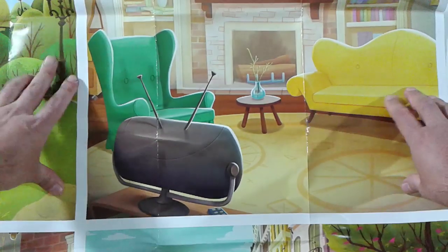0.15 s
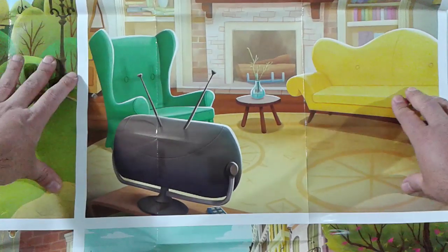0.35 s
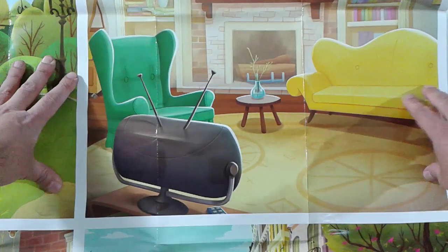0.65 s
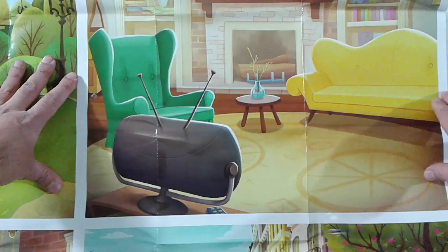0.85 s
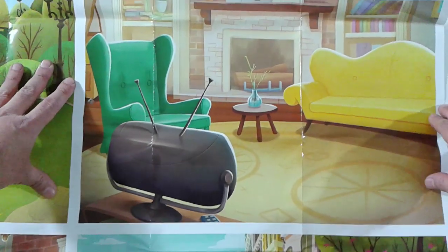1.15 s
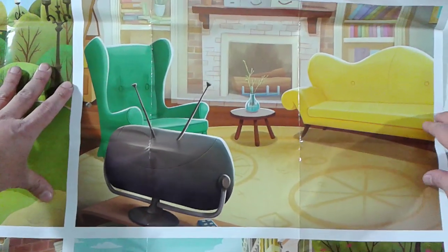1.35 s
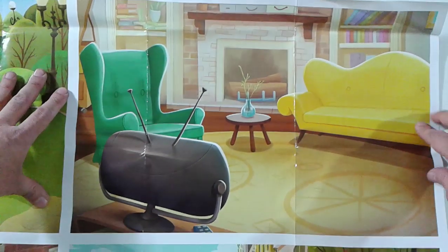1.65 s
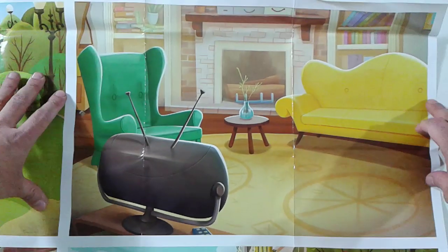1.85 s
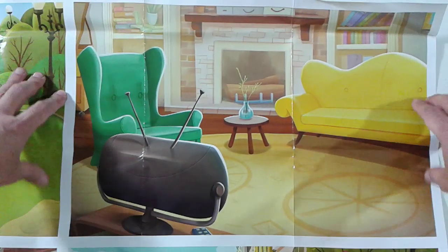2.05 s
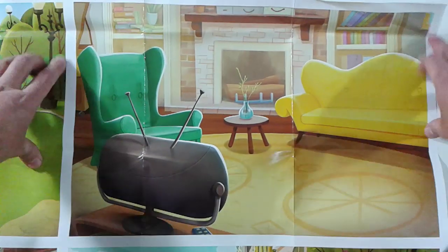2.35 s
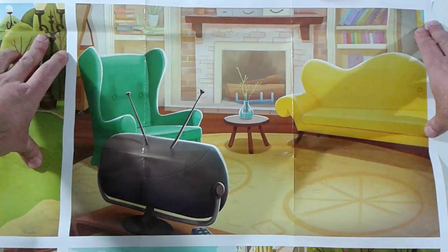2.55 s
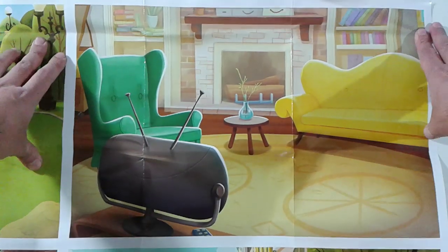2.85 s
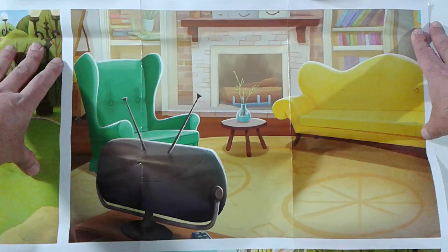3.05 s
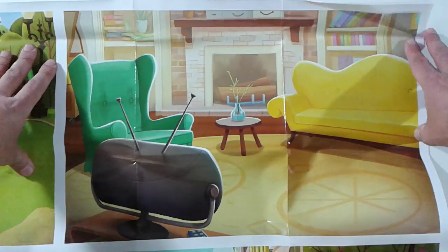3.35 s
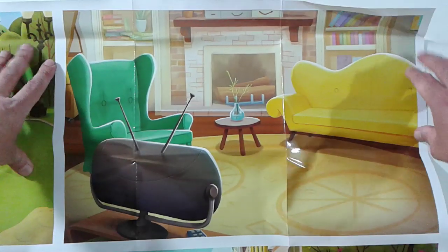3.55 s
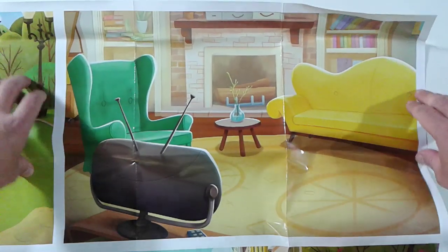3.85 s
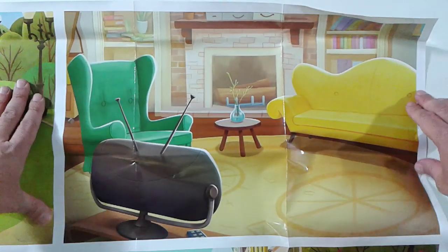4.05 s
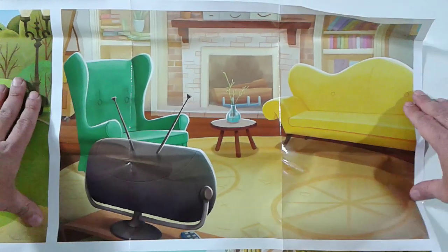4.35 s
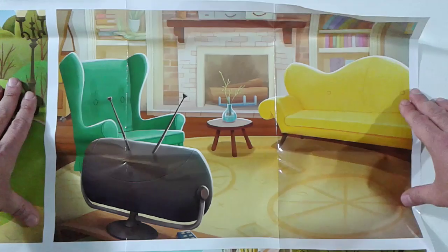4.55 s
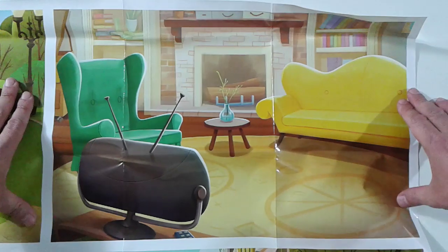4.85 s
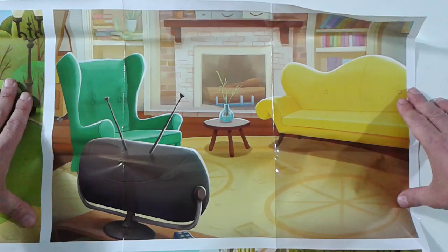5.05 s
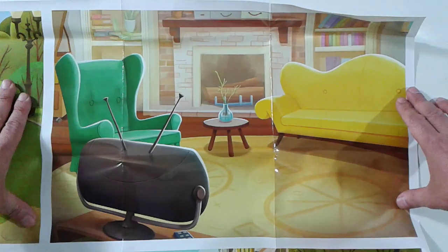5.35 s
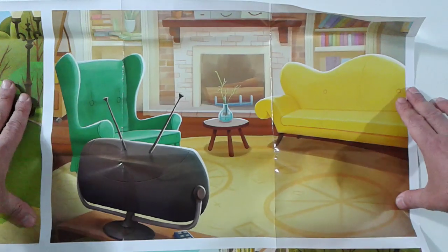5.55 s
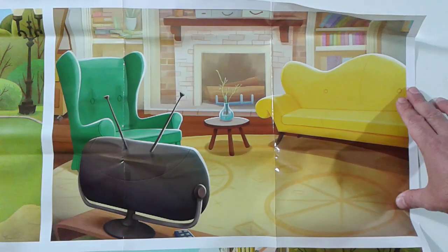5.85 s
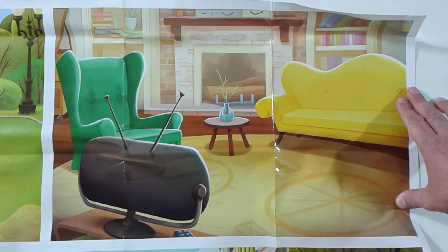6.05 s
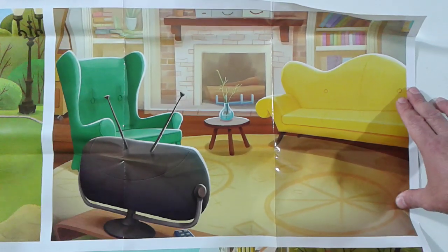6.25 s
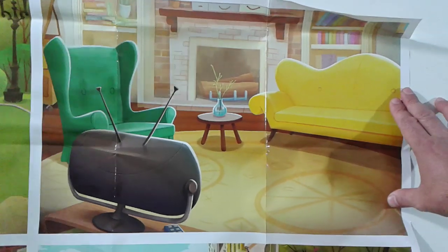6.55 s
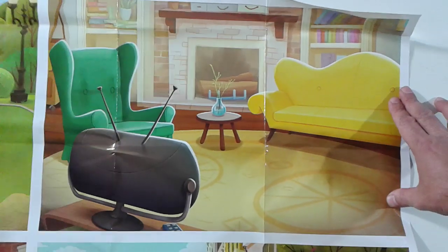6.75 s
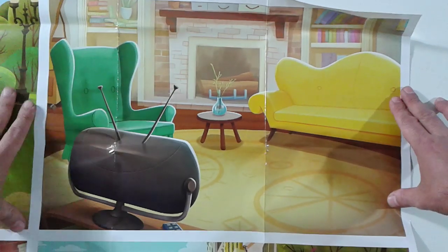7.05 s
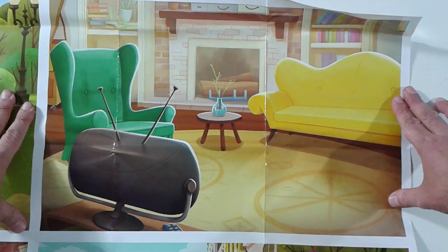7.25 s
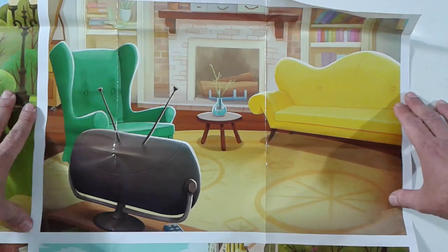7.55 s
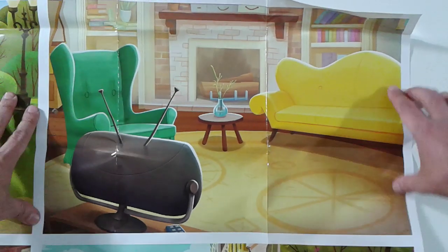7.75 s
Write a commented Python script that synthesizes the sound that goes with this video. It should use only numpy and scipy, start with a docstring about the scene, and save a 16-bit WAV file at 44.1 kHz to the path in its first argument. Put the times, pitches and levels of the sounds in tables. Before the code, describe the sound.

Close up in a small room, hands flatten a large folded glossy sheet on a table. Sharp crease pops and brisk rubbing open the sound, with brief fingertip squeaks. It calms to faint scraping, then irregular bursts of crackle and soft rustle return, separated by near-quiet with low hum and light hiss.

```python
"""A small room, heard close up: two hands spread a large, folded, glossy paper sheet over a table.
Creases snap through as the sheet buckles: noise bursts shaped by crack, facet, panel and sheet resonances.
Palms and paper slide as grainy friction noise, tiny wrinkles tick, and fingertips squeak faintly on
the coating as gliding narrow-band noise. Diffuse echoes answer over a low hum, rumble and hiss."""
import sys
import numpy as np
from scipy import signal
from scipy.fft import rfft, irfft
from scipy.io import wavfile
from scipy.ndimage import uniform_filter1d

SR = 44100
rng = np.random.default_rng(int(sys.argv[2]) if len(sys.argv) > 2 else 0)


def pcm_store(signal):
    """Save signal as 16-bit PCM."""
    levels = np.round(np.clip(np.atleast_2d(signal), -1, 1) * 32767)
    wavfile.write(sys.argv[1], SR, levels.astype(np.int16).T)


N = 348390


def gain_of(db):
    """Logarithmic level: decibels to amplitude."""
    return 10 ** (np.asarray(db) / 20)


def evened(x):
    """Normalization: scales to an rms of 1."""
    return x / np.sqrt(np.mean(abs(x) ** 2) + 1e-20)


def read(points, hz):
    """Interpolation: reads a table along a logarithmic frequency axis."""
    f, value = np.transpose(points)
    return np.interp(np.log(hz + 1), np.log(f + 1), value)


def add(mix, start_s, sound):
    """Superposition: sums a sound into the mix from its start time."""
    part = mix[max(round(start_s * SR), 0):][:len(sound)]
    part += sound[:len(part)]


def coloured(x, spectrum):
    """Linear filtering: gives a flat signal a spectrum, at an rms of 1."""
    hz = np.fft.rfftfreq(N, 1 / SR)
    return evened(irfft(rfft(x) * gain_of(read(spectrum, hz)), N))


def causal(gain):
    """Minimum phase: the spectrum of this gain that starts sharply and rings afterwards."""
    log_gain = np.log(np.maximum(gain / gain.max(), 1e-5))
    circle = np.r_[log_gain, log_gain[-2:0:-1]]
    phase = -signal.hilbert(circle).imag[:len(gain)]
    return gain * np.exp(1j * phase)


FACET_RING_DB = 11.5  # a facet's ring over the crack that strikes it
FLAP_HZ, FLAP_HZ_PER_DB = 538, 5  # a panel that is jerked harder is tauter and flaps higher
# the whole sheet heaves under each crack, by the root of its strength
HEAVE_HZ, HEAVE_OCTAVES, HEAVE_DB = 191, 0.53, -28
# Creases snapping through: start_s, crack_energy_db, crack_hz, crack_spread_octaves, facet_ring_hz,
# flap_energy_db, room_db (before the common echo_db)
CREASE_SNAPS = [(0.0244, -0.5, 2140, 1.05, 5730, -19, -8), (0.0682, -8.5, 1270, 1.4, 5330, -5, -9),
                (0.1076, -16.5, 900, 2.4, 2490, -34, -15), (0.2071, -8, 3520, 1.3, 6800, -43, -5),
                (0.2099, -4, 2300, 1.1, 4640, -15.5, -3.5), (0.5621, -24, 1300, 0.49, 1390, -16, 1),
                (0.5745, -1.5, 1540, 2, 5000, -5.5, -4), (0.6604, -13.5, 980, 0.76, 820, -18, -0.5),
                (0.7047, -23, 1200, 0.64, 1280, -20, -2), (0.7648, -6.5, 940, 1.74, 1300, -9.5, -5),
                (0.8517, -7.5, 2170, 1.23, 2550, -29, -9.5), (0.9054, -11.5, 6500, 4, 6100, -24, -4.5),
                (1.0164, -46, 2500, 2.4, 1260, -23, -1.5), (1.076, -10, 2690, 4.1, 5800, -32, -1.5),
                (1.0919, -21.5, 2500, 4, 880, -13.5, 0.5), (1.206, -30, 6660, 1.6, 2050, -24, -0.5),
                (1.9523, -26.5, 5730, 2, 1180, -37, 0), (2.1709, -21.5, 1710, 1.05, 900, -21, 2),
                (2.199, -11, 1550, 1.04, 1910, -8.5, -4.5), (2.2743, -8.5, 1030, 1.7, 2780, -29, -4),
                (2.383, -18.5, 7840, 2, 1800, -32, -7), (2.466, -21.5, 1530, 1.9, 5700, -27, 5.5),
                (3.0392, -26, 900, 3.3, 900, -20.5, 2), (3.2372, -25.5, 2870, 2.5, 1260, -34, 1.5),
                (3.366, -9, 1100, 3.9, 4440, -16, -2.5), (3.531, -23, 7640, 3.8, 1490, -44, -3.5),
                (3.7339, -27, 1590, 2.6, 1160, -22, 10.5), (3.7582, -23, 700, 2.4, 1210, -21, 2),
                (3.877, -5, 2160, 1.5, 4110, -15.5, -3.5), (4.0749, -7.5, 1450, 1.7, 2800, -28, -4.5),
                (4.307, -24, 3000, 2.1, 1460, -37, 5), (4.3997, 1.5, 1610, 1.06, 1620, -2.5, -6.5),
                (4.7461, -49, 3000, 3, 1410, -25.5, 1), (5.0898, -38, 885, 2.6, 1400, -36.5, -1),
                (5.3252, -30.5, 3760, 3.5, 1460, -26.5, -9), (5.6106, -18.5, 5700, 2.5, 955, -25, -3.5),
                (5.6203, -15, 2200, 2.4, 1320, -20.5, -3.5), (6.026, -32.5, 4130, 3.3, 1400, -28.5, -3),
                (6.128, -1.5, 1980, 1.03, 1090, -9, -4.5), (6.132, -9, 750, 1.5, 2020, -22, 0.5),
                (6.3147, -15.5, 900, 0.84, 1140, -20, -7), (6.389, -27, 2450, 2.5, 2110, -16.5, -5),
                (6.5547, -21.5, 1620, 1.7, 6000, -48, 5.5), (6.6066, -11, 2010, 0.98, 1390, -10, -1),
                (6.6638, -9.5, 1200, .79, 2580, -1.5, -3), (6.791, -8.5, 1160, 2.6, 980, -19, -2),
                (6.8048, -11.5, 1110, 0.72, 1950, -20, -1.5), (7.089, -13.5, 1090, 1.55, 1450, -9, -0.5),
                (7.1081, -18.5, 2240, 1, 1530, -11, -5), (7.518, -28, 905, 3.1, 1070, -28.5, -14),
                (7.666, -29, 3700, 1.3, 3020, -43, -7), (7.6903, -13.5, 1880, 0.78, 1970, -20, -12),
                (7.748, -42, 2770, 3, 2360, -18, -9), (7.8397, -17.5, 1420, 0.44, 1530, -37, -4.5),
                (7.878, -21, 900, 2, 1350, -13, -6)]


def snaps(snap_time=0.0027, snap_hz=1500, shortening=0.35, flap_octaves=0.88, direct_db=0, echo_db=-0.5,
          bounce=0.25, bounce_time=0.001065, ring_in_room=0.47, spread_in_room=1.36):
    """Snap-through buckling: a crease cracks, rings a stiff facet, jerks its panel and heaves the sheet."""
    out, hz = np.zeros(N), np.fft.rfftfreq(2048, 1 / SR)
    for start_s, crack_db, crack_hz, octaves, ring_hz, flap_db, room_db in CREASE_SNAPS:
        # small, bright creases give way faster
        slips = buckle(snap_time * (snap_hz / crack_hz) ** shortening)

        flap_hz = FLAP_HZ + FLAP_HZ_PER_DB * flap_db
        flap = gain_of(flap_db) * radiated(hz, flap_hz, flap_octaves)
        heave = gain_of(crack_db / 2 + HEAVE_DB) * radiated(hz, HEAVE_HZ, HEAVE_OCTAVES)
        low_motion = np.hypot(flap, heave)

        # the crack also bounces off the table, which combs its spectrum
        delay_s = bounce_time * rng.uniform(0.453, 1.484)
        comb = evened(1 + bounce * np.exp(-2j * np.pi * hz * delay_s))
        crack = gain_of(crack_db) * radiated(hz, crack_hz, octaves, ring_hz, FACET_RING_DB) * abs(comb)
        direct = irfft(slips * causal(np.hypot(crack, low_motion)))
        add(out, start_s, gain_of(direct_db) * direct)

        # the room gathers sound from all directions, so it hears a broader crack
        broad = radiated(hz, crack_hz, octaves * spread_in_room, ring_hz, FACET_RING_DB * ring_in_room)
        into_room = irfft(slips * causal(np.hypot(gain_of(crack_db) * broad, low_motion)))
        # every place meets the room differently: a fresh set of echoes
        echoes = signal.fftconvolve(into_room, room())
        add(out, start_s, gain_of(room_db + echo_db) * echoes)
    return out


def buckle(length, size=2048):
    """Stick-slip burst: tiny slips swell and stop in a few milliseconds, with a flattened spectrum."""
    u = np.arange(size) / SR / length
    burst = rng.standard_normal(size) * np.sqrt(u) * np.exp(-u ** 2)
    slips = evened(rfft(burst))
    smooth_power = uniform_filter1d(abs(slips) ** 2, size=25)
    return evened(slips * causal(1 / np.sqrt(smooth_power + 1e-4)))


# Broad resonances of the sheet on the table: centre_hz, width_hz, level_db
SHEET_RESONANCES = [(512, 164, 10), (696, 53, -1.5), (1030, 310, 0.5), (6100, 2300, 2)]


def radiated(hz, centre_hz, octaves, ring_hz=1000, ring_db=0, top_hz=6700, bottom_hz=220, ring_q=6):
    """Radiation efficiency: a ringing hump of unit energy; thin paper radiates little bass or top treble."""
    hump = (1 + (np.log2((hz + 1) / centre_hz) / octaves) ** 2) ** -3
    ring = 1 + (gain_of(ring_db) ** 2 - 1) / (1 + (2 * ring_q * (hz / ring_hz - 1)) ** 2)
    top_hz = max(top_hz, 1.3 * centre_hz)  # the tiniest creases reach higher
    ends = (1 + (hz / top_hz) ** 10) * (1 + (bottom_hz / (hz + 1)) ** 4)
    body_db = sum(db / (1 + (2 * (hz - f) / width) ** 2) for f, width, db in SHEET_RESONANCES)
    return evened(np.sqrt(hump * ring / ends) * gain_of(body_db))


def crinkles(ticks_per_s=30, spread_db=4, under_db=-13, room_db=-4, count=10):
    """Poisson impulses: wrinkles of several pitches tick at random while the sheet moves."""
    hz, out = np.fft.rfftfreq(1024, 1 / SR), np.zeros(N)
    for centre_hz in np.geomspace(1500, 9000, count):
        sizes = gain_of(spread_db * np.minimum(rng.exponential(1, N), 3))
        ticks = sizes * (rng.random(N) < ticks_per_s / count / SR)
        tick_sound = irfft(causal(radiated(hz, centre_hz, octaves=2.0)))
        out += signal.oaconvolve(ticks, tick_sound)[:N]
    _, hiss = pushes()
    out = evened(out) * hiss * gain_of(under_db)
    return out + gain_of(room_db) * signal.fftconvolve(out, room())[:N]


# Spectrum of the sheet's rustle: frequency_hz, relative_level_db
RUSTLE_SPECTRUM = [(25, -47), (70, -48), (130, -10.5), (280, -8.5), (500, 2), (750, -6), (1200, -7.5),
                   (2000, -9.5), (3200, -13.5), (8000, -26.5)]
# Spectrum of skin hissing on the coating: frequency_hz, relative_level_db
SKIN_SPECTRUM = [(200, -25), (600, -15), (1500, -5.5), (2600, -4.5), (4200, 1), (6400, 0.5), (8000, -5.5),
                 (10500, -12), (12500, -15.5), (15000, -19)]


def sliding(sheet_db=0, skin_db=0):
    """Sliding friction: the sheet drags over the table while the palms brush its coating."""
    rustle, hiss = pushes()
    sheet = friction(RUSTLE_SPECTRUM, grains_per_s=400, spread_db=4, smooth=.8, patchy_db=1.3, room_db=-3)
    skin = friction(SKIN_SPECTRUM, grains_per_s=1000, spread_db=3.5, smooth=.8, patchy_db=1, room_db=-4)
    return sheet * rustle * gain_of(sheet_db) + skin * hiss * gain_of(skin_db)


def friction(spectrum, grains_per_s, spread_db, smooth, patchy_db, room_db):
    """Asperity contact: uneven tiny catches over a smooth rub; the colour drifts as the contact moves."""
    sizes = gain_of(spread_db * np.minimum(rng.exponential(1, N), 4)) * rng.choice([-1, 1], N)
    catches = evened(sizes * (rng.random(N) < grains_per_s / SR))
    contact = catches + smooth * rng.standard_normal(N)

    z = signal.stft(contact, nperseg=512)[2]
    patches = uniform_filter1d(rng.standard_normal(z.shape), size=9, axis=0)  # smooth over pitch
    patches = evened(uniform_filter1d(patches, size=7, axis=1))  # and over time
    rub = signal.istft(z * gain_of(patchy_db * patches), nperseg=512)[1][:N]
    echoes = signal.fftconvolve(rub, room())[:N]
    return coloured(rub + gain_of(room_db) * echoes, spectrum)


SETTLE_DB_PER_S = 167  # the sheet comes to rest after a push
CREEP_DB, CREEP_DB_PER_S = -23.5, 25  # and then creeps on faintly under the resting hands
# Pushes of the hands: start_s, swell_s, length_s (start to release), rustle_db, hiss_db
HAND_PUSHES = [(0.0, 0.0016, .11, -46, -47), (0.167, 0.038, .03, -46, -43.5),
               (0.24, 0.077, 0.064, -48.5, -41.5), (0.412, .01, 0.023, -47.5, -51.5),
               (0.446, 0.15, 0.56, -59, -53.5), (0.896, 0.034, 0.024, -48.5, -37.5),
               (0.95, .02, .21, -53, -51), (1.166, 0.051, 0.53, -58, -53), (1.7, 0.05, 0.2, -59, -61),
               (1.93, 0.32, 0.37, -59, -60.5), (2.266, .015, 0.1, -55, -54.5),
               (2.361, 0.027, 0.036, -51.5, -44.5), (2.449, .025, 0.076, -50, -54),
               (2.816, 0.096, 0.17, -56, -59.5), (2.975, 0.06, 0.13, -51, -54),
               (3.12, 0.059, 0.34, -56.5, -58), (3.23, 0.022, 0.035, -61, -55),
               (3.599, 0.063, 0.091, -59, -58), (3.72, 0.072, 0.16, -52.5, -47.5),
               (3.872, 0.067, 0.28, -55.5, -55), (4.14, 0.13, 0.36, -51, -53),
               (4.583, 0.1, 0.17, -55, -60.5), (4.85, .08, 0.37, -72.5, -75), (5.288, .03, 0.037, -62, -61),
               (5.587, 0.032, 0.11, -58.5, -61.5), (6.016, 0.15, 0.25, -50, -54.5),
               (6.297, 0.21, 0.25, -51, -51.5), (6.58, 0.022, 0.027, -49, -44),
               (6.673, 0.037, 0.15, -51.5, -58), (7.036, 0.076, 0.14, -53.5, -59),
               (7.257, .04, 0.15, -69, -73), (7.432, 0.027, 0.34, -61.5, -63),
               (7.674, 0.02, 0.2, -56.5, -61)]


def pushes():
    """Amplitude envelopes, summed in power: each push swells, holds, settles and leaves a faint creep."""
    t, power = np.arange(0, N / SR, .002), 0
    for start, swell, length, rustle_db, hiss_db in HAND_PUSHES:
        rise = np.sin(np.pi / 2 * np.clip((t - start) / swell, 0, 1))
        after = np.maximum(t - start - length, 0)
        fall = gain_of(np.maximum(-SETTLE_DB_PER_S * after, CREEP_DB - CREEP_DB_PER_S * after))
        power = power + np.outer(gain_of([rustle_db, hiss_db]), rise * fall) ** 2
    return [np.interp(np.arange(N) / SR, t, np.sqrt(p)) for p in power]


SQUEAK_LOW_HZ = 223  # high-pass corner that keeps the squeaks free of low thumps
# Fingertip squeaks, scrapes and a low groan:
# start_s, length_s, start_hz, end_hz, width_hz, level_db (rms before the high-pass)
FINGERTIP_SQUEAKS = [(0.177, 0.024, 1410, 1900, 700, -48), (0.219, 0.06, 3395, 3850, 700, -45.5),
                     (0.22, .042, 6160, 7100, 700, -44.5), (0.262, 0.047, 6500, 5780, 700, -43.5),
                     (0.272, .04, 4700, 4080, 800, -46), (0.285, .03, 2893, 1392, 900, -41),
                     (0.298, 0.0435, 1302, 1203, 1100, -43.5), (1.136, 0.099, 6860, 7900, 500, -59.5),
                     (1.20, 0.059, 7970, 6050, 500, -57), (1.242, 0.045, 5400, 4330, 550, -56.5),
                     (1.283, 0.048, 4360, 3080, 500, -62), (1.314, .08, 6600, 5970, 650, -55.5),
                     (1.376, 0.057, 5700, 6530, 700, -52.5), (1.411, 0.024, 6440, 6400, 250, -50),
                     (1.452, 0.063, 4160, 3720, 500, -60), (1.508, 0.048, 3300, 2930, 400, -61.5),
                     (1.555, .07, 7070, 8200, 650, -60), (4.195, 0.2, 527, 485, 156, -58.5)]


def squeaks(room_db=-4):
    """Stick-slip oscillation: the slip rate follows finger speed; uneven slips widen a note into a scrape."""
    out = np.zeros(N)
    for start_s, length_s, start_hz, end_hz, width_hz, level_db in FINGERTIP_SQUEAKS:
        n = int(length_s * SR)
        phase = 2 * np.pi * np.cumsum(np.geomspace(start_hz, end_hz, n)) / SR
        b, a = signal.butter(2, width_hz / 2, fs=SR)
        grip = signal.lfilter(b, a, rng.standard_normal((2, SR // 2)))[:, :n]
        note = grip[0] * np.cos(phase) + grip[1] * np.sin(phase)
        add(out, start_s, gain_of(level_db) * evened(note * signal.windows.tukey(n, .6)))
    out = signal.sosfilt(signal.butter(2, SQUEAK_LOW_HZ, "high", fs=SR, output="sos"), out)
    return out + gain_of(room_db) * signal.fftconvolve(out, room())[:N]


# Reverberation time of the room, before the early boost: frequency_hz, t60_s
REVERBERATION = [(150, 0.6), (500, 0.23), (1500, 0.29), (4500, 0.33), (12000, 0.34)]
# Colour of the room's answer: frequency_hz, level_db
ECHO_COLOUR = [(120, 7), (300, 11.5), (520, -6.5), (750, 6), (1100, 5.5), (2500, 2), (6000, 0.5),
               (14000, 7)]


def room(gap=0.0027, early=1.0, early_time=0.092):
    """Diffuse-field decay: echoes stronger at first, each band dying at its own speed (times in s)."""
    t = np.arange(SR // 2) / SR
    z = signal.stft(rng.standard_normal(len(t)), nperseg=512)[2]
    # energy spread evenly over time and pitch
    diffuse = signal.istft(z / abs(z), nperseg=512)[1][:len(t)]
    boosted = diffuse * (t > gap) * (1 + early * np.exp(-t / early_time))
    hz, when, z = signal.stft(boosted, SR, nperseg=256)
    z = z * gain_of(-60 * when / read(REVERBERATION, hz)[:, None])
    # unit energy before the colour is applied
    norm = np.linalg.norm(signal.istft(z, SR, nperseg=256)[1])
    return signal.istft(z * gain_of(read(ECHO_COLOUR, hz))[:, None], SR, nperseg=256)[1] / norm


AMBIENCE_DB = -60.5  # rms level of rumble and hiss
# Spectrum of rumble and hiss: frequency_hz, relative_level_db
AMBIENCE_SPECTRUM = [(15, -21), (25, -25.5), (109, -3.5), (154, -6), (207, -11.5), (588, -20.5),
                     (2240, -26.5), (3180, -29.5), (3440, -25), (3730, -29), (4040, -28), (4750, -28.5),
                     (8320, -30.5), (9270, -29.5), (15000, -29.5)]


def ambience(hum_hz=110, hum_width_hz=10, hum_db=-72):
    """Stationary noise: room rumble and microphone hiss, with narrow-band noise as a wavering low hum."""
    hz = np.fft.rfftfreq(N, 1 / SR)
    resonance = 1 / (1 + (2 * (hz - hum_hz) / hum_width_hz) ** 2)
    hum = irfft(rfft(rng.standard_normal(N)) * resonance, N)
    floor = coloured(rng.standard_normal(N), AMBIENCE_SPECTRUM)
    return gain_of(AMBIENCE_DB) * floor + gain_of(hum_db) * evened(hum)


def scene():
    """Superposition: all sources add at one microphone."""
    return (snaps() + crinkles() + sliding() + squeaks() + ambience())[None]


EDGE_HZ = 15150  # upper band edge


def record(dry):
    """Band limitation: a linear-phase low-pass sets the recorder's upper edge."""
    low_pass = signal.firwin(511, EDGE_HZ, window=("kaiser", 9), fs=SR)
    return signal.oaconvolve(dry, low_pass[None], "same")


dry = scene()
out = record(dry)
pcm_store(out)
```